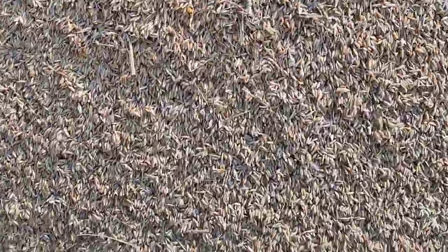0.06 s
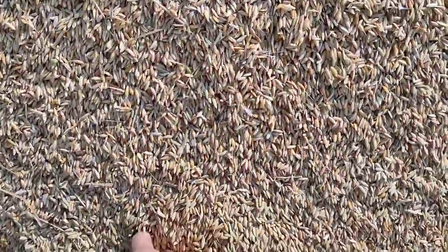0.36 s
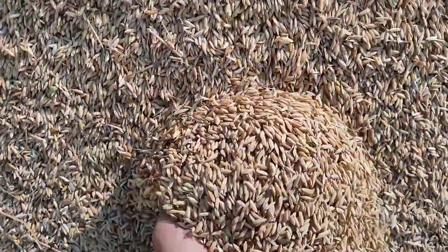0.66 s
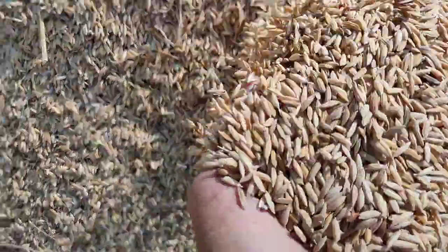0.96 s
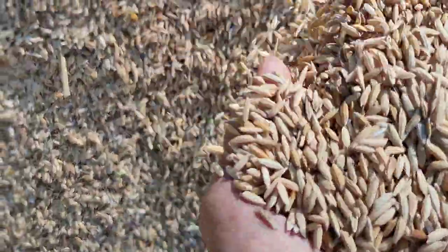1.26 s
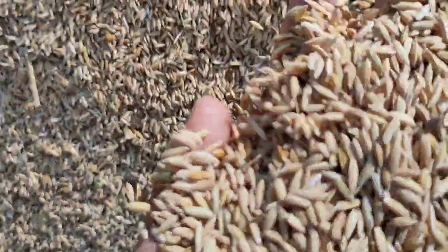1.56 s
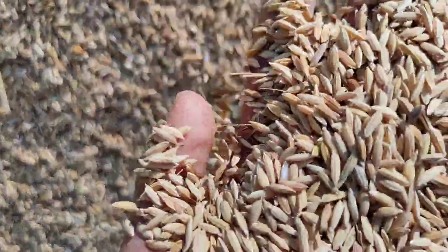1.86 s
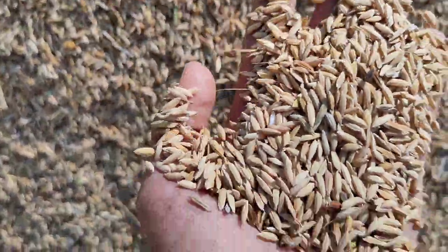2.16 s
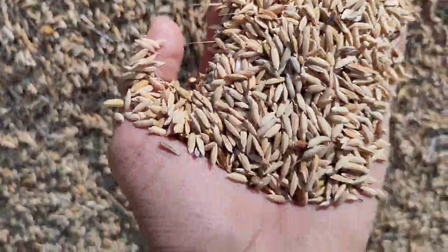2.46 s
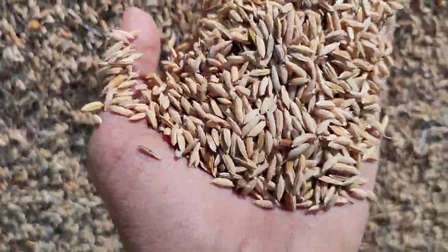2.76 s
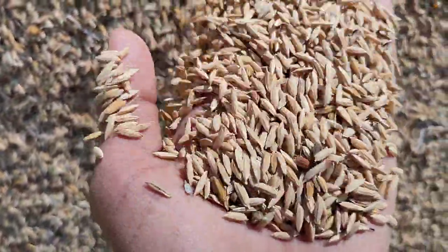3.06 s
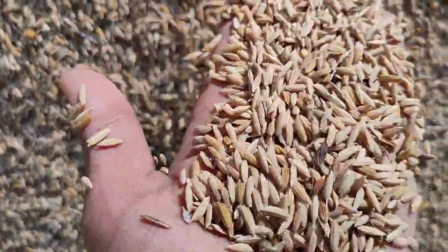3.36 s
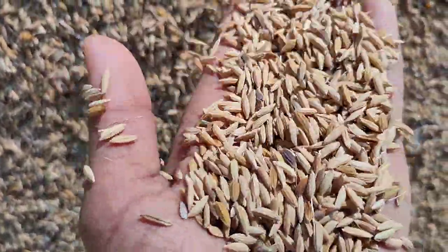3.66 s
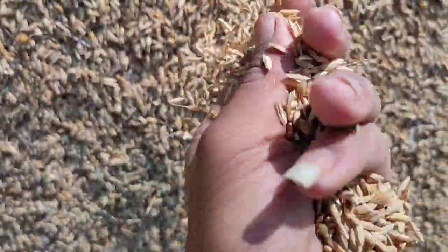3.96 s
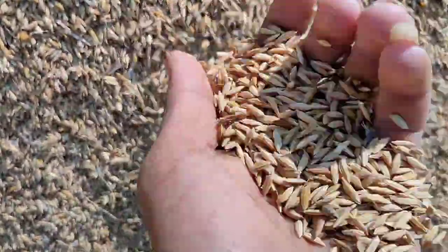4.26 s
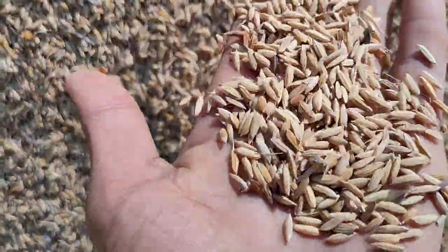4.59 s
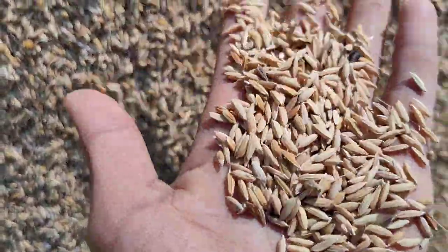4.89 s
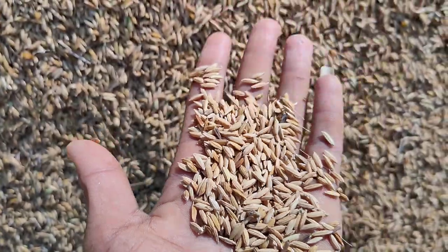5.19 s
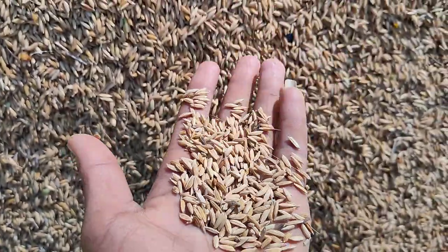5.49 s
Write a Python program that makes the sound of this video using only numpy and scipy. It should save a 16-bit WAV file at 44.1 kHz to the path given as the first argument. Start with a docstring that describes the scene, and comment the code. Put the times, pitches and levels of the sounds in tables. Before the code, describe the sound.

Grain slides and clicks off a close handful over the constant roar, fast rattle and faint hum of a tractor-driven thresher.

```python
"""An open farmyard, beside the grain heap: a tractor drives a threshing machine.
The engine hums under the fan's roar; the belt-driven drum beats the crop once a turn.
Under load both slow down and the thresher runs louder. Grain hisses through the machine,
straw rasps and rushes in bursts, and kernels slide and tick off a handful close by."""
import sys
import numpy as np
from scipy import signal
from scipy.fft import rfft, irfft
from scipy.io import wavfile

SR = 44100
rng = np.random.default_rng(int(sys.argv[2]) if len(sys.argv) > 2 else 0)


def transcribe(u):
    """Save the signal u as a 16-bit wav file named by the first command-line argument.

    u: samples, shape (n,) or (channels, n), limited to [-1, 1]; the rate is SR.
    q: integer samples, one column per channel.
    """
    v = np.clip(np.atleast_2d(u).T, -1, 1)
    q = np.round(v * 32767).astype(np.int16)
    wavfile.write(sys.argv[1], SR, q)


N = 248283
TIME_S = np.arange(N) / SR
BINS_HZ = np.fft.rfftfreq(N, 1 / SR)


def gain_of(db):
    """Decibels to amplitude factor."""
    return 10 ** (np.asarray(db) / 20)


def unit_rms(x):
    """Scales to rms 1."""
    return x / np.sqrt(np.mean(x ** 2) + 1e-20)


def curve(rows):
    """Linear interpolation of (time, value) rows."""
    return np.interp(TIME_S, *np.transpose(rows))


def spectrum(rows):
    """Interpolates each column over log frequency."""
    hz, *columns = np.transpose(rows)
    return np.array([np.interp(np.log(BINS_HZ + 1), np.log(hz + 1), c) for c in columns])


def swell(peak_s, half_width_s):
    """Gaussian rise and fall, peak 1."""
    return np.exp(-2 * ((TIME_S - peak_s) / half_width_s) ** 2)


def drift(cutoff_hz):
    """Slow random wander, rms 1."""
    return unit_rms(irfft(rfft(rng.standard_normal(N)) / (1 + (BINS_HZ / cutoff_hz) ** 4), N))


def band_noise(hz, width_hz, size=N):
    """Noise in one steep resonance, independent per side."""
    offset = (np.fft.rfftfreq(size, 1 / SR) - hz) / width_hz
    return unit_rms(irfft(rfft(rng.standard_normal((2, size))) / (1 + offset ** 2) ** 3, size))


def crackle(near_share, per_s, spread_db):
    """Separate near impacts in a wash of countless far ones."""
    strength = gain_of(spread_db * np.minimum(rng.exponential(1, (2, N)), 4))
    polarity = rng.choice([-1, 1], (2, N))
    hits = rng.random((2, N)) < per_s / SR
    near = unit_rms(strength * polarity * hits)
    far = rng.standard_normal((2, N))
    return np.sqrt(near_share) * near + np.sqrt(1 - near_share) * far


def beat(turns, depth, decay_turns):
    """Envelope: one decaying blow per turn, of uneven strength."""
    blow = np.exp(-(turns % 1) / decay_turns) * gain_of(7.1 * drift(30))
    return unit_rms(np.sqrt(1 + depth * blow))


# Left-right likeness: (frequency [Hz], coherence [0-1])
COHERENCE = [(100, 0.99), (320, 0.96), (600, 0.97), (850, 1), (1100, 0.56), (1500, 0.64), (2200, 0.58),
             (3200, 0.42), (4300, 0.26), (6000, 0.18), (12000, 0.05)]


def radiate(drive, colour, lag_ms):
    """Colours a stereo drive, partly coherent, left side late; the mid signal has rms 1."""
    common, separate = rfft(drive)
    coherence = np.clip(spectrum(COHERENCE)[0], 0, 1)
    left = common * np.exp(-2j * np.pi * BINS_HZ * lag_ms / 1000)
    right = coherence * common + np.sqrt(1 - coherence ** 2) * separate
    pair = irfft(np.array([left, right]) * gain_of(spectrum(colour)), N)
    return pair / np.std(pair.mean(0))


# Crankshaft: (time [s], speed [turns/s])
ENGINE_SPEED = [(0, 33.45), (.5, 33.72), (1.4, 34.36), (2.45, 33.28), (3, 33.61), (3.5, 33.77), (5, 34.66),
                (5.63, 34.84)]
# Hum partials: (order [x engine speed], base level [dB])
ENGINE_ORDERS = [(8, -48.5), (9, -40.5), (10, -40.3), (11, -54), (11.5, -50.5), (13, -47.5), (14, -44),
                 (15, -52), (16, -52), (23, -48), (24, -61), (26, -63)]
# Hum contour: (time [s], level offset [dB])
HUM_CONTOUR = [(0, -3), (2, -1), (3.2, -0.9), (3.8, 1), (5.1, -1.5)]
# Panel resonances: (frequency [Hz], width [Hz], lift [dB])
PANEL_MODES = [(307.6, 8.3, 4.5), (467.7, 4.2, 5.5)]


def engine(turns, waver_db=2.0, jitter_rad=0.28, flutter_rad=0.00051):
    """Engine orders waver a little and boom as they pass a panel resonance."""
    hum = np.zeros((2, N))
    lag_turns = np.array([[.0062], [0]])
    speed_hz = curve(ENGINE_SPEED)
    for order, db in ENGINE_ORDERS:
        # uneven rotation blurs the highest orders most
        unsteady_rad = jitter_rad * drift(7.7) + flutter_rad * order ** 2 * drift(22)
        phase_rad = 2 * np.pi * (order * (turns - lag_turns) + rng.random()) + unsteady_rad
        boom_db = sum(lift_db / (1 + (2 * (order * speed_hz - hz) / width_hz) ** 2)
                      for hz, width_hz, lift_db in PANEL_MODES)
        level_db = curve(HUM_CONTOUR) + db + boom_db + waver_db * drift(3.2)
        hum += np.sqrt(2) * gain_of(level_db) * np.sin(phase_rad)
    return gain_of([[-.8], [0]]) * hum


# Wads of crop, negative for thin feed: (time [s], swell [dB], half-width [s])
FEED_WADS = [(.09, 0.8, 0.18), (0.577, -1.2, 0.13), (0.836, 1.5, .1), (1.3, 0.5, 0.24), (1.742, 1.6, 0.32),
             (3.224, 4.3, 0.061), (3.427, 5, 0.019), (3.694, 0.5, 0.2)]


def working_db(base_db, db_per_sag_hz, wad_scale, usual_speed_hz=34):
    """A part runs louder as load drags the engine down and as a wad passes."""
    sag_hz = usual_speed_hz - curve(ENGINE_SPEED)
    wads_db = sum(db * swell(s, half_width_s) for s, db, half_width_s in FEED_WADS)
    return base_db + db_per_sag_hz * sag_hz + wad_scale * wads_db


# Fan spectrum: (frequency [Hz], left [relative dB], right [relative dB])
FAN_COLOUR = [(138, -61, -62), (209, -42, -38), (263, -15.5, -14.5), (271, -8.5, -11), (322, 0, 2),
              (353, -3.5, -2), (430, -2.5, -4), (547, -9.5, -7), (740, -13.5, -11), (800, -9.5, -9),
              (815, -14, -13.5), (1190, -24, -20.5), (2010, -79, -60)]


def fan(turns, rise_s=0.26, rise_db=5):
    """The winnowing fan's roar swells at first and throbs once per drum turn."""
    air = rng.standard_normal((2, N)) * beat(turns, depth=.4, decay_turns=0.062)
    onset_db = rise_db * np.minimum(TIME_S / rise_s - 1, 0)
    level_db = working_db(-33, db_per_sag_hz=0.63, wad_scale=0.74) + onset_db
    return radiate(air, FAN_COLOUR, lag_ms=0.12) * gain_of(level_db + .5 * drift(5.3))


# Casing and stalk spectra: (frequency [Hz], left [relative dB], right [relative dB])
CASING_COLOUR = [(500, -56, -47), (880, -2, -16.5), (1070, 0, -4.5), (1400, 1.5, -1.5), (1790, 0, -3.5),
                 (2140, -0.5, -13.5), (2980, -55, -17), (6000, -67, -54)]
STALK_COLOUR = [(1200, -40, -57), (1880, -2.5, -16), (2320, -11.5, -3), (2700, 0, -6), (3500, -1, -9),
                (4210, -3.5, -12), (5020, -10.5, -17), (6050, -21, -12.5), (9000, -45, -27)]


def drum(turns):
    """Beaters hit the crop each turn: the casing clatters, the stalks rattle."""
    clatter = crackle(0.09, per_s=900, spread_db=0) * beat(turns, depth=1.9, decay_turns=0.038)
    rattle = crackle(0.24, per_s=1800, spread_db=2.5) * beat(turns, depth=1, decay_turns=0.09)
    casing_db = working_db(-43, db_per_sag_hz=.8, wad_scale=1.04) + 0.16 * drift(32)
    stalks_db = working_db(-42.5, db_per_sag_hz=0.98, wad_scale=0.78) + 1.15 * drift(19)
    casing = radiate(clatter, CASING_COLOUR, lag_ms=0.29) * gain_of(casing_db)
    stalks = radiate(rattle, STALK_COLOUR, lag_ms=0.328) * gain_of(stalks_db + 0.12 * scrape_db())
    return casing + stalks


# Grain stream spectrum: (frequency [Hz], left [relative dB], right [relative dB])
GRAIN_COLOUR = [(2500, -49, -38), (4930, -15, -16), (6020, -14.5, -14), (6680, -7, 0), (7300, -7, 2),
                (8350, -7, -4), (9600, -9, -7), (10500, -6, -12), (12000, -10, -7.5), (13600, -12.5, -18),
                (14900, -20, -4.5), (15600, -21, -12)]


def grain(turns, scoop_s=0.57, scoop_pan_db=7.0):
    """A dense kernel stream pulses with the drum; its hiss swings left as the hand scoops."""
    impacts = crackle(0.14, per_s=3000, spread_db=4) * beat(turns, depth=.5, decay_turns=0.18)
    level_db = working_db(-42.1, db_per_sag_hz=1, wad_scale=0.22) + 0.74 * drift(27)
    stream = radiate(impacts, GRAIN_COLOUR, lag_ms=0.334) * gain_of(level_db)
    pan_db = -1.1 + scoop_pan_db * swell(scoop_s, half_width_s=0.49)
    return stream * gain_of(pan_db * [[.5], [-.5]])


# Straw on the sieve: (start [s], hold [s], swell [dB])
SIEVE_SCRAPES = [(-.2, .9, 1), (2.14, 0.21, 7.0)]


def scrape_db(rise_s=0.16, fall_s=.09):
    """Each long scrape rises, holds and falls."""
    return sum(db * np.interp(TIME_S, np.cumsum([s, rise_s, hold_s, fall_s]), [0, 1, 1, 0])
               for s, hold_s, db in SIEVE_SCRAPES)


# Straw spectrum: (frequency [Hz], left [relative dB], right [relative dB])
STRAW_COLOUR = [(1010, -48, -54), (1720, -8.5, -49), (2040, -2.5, -2), (2270, 3, -41), (2570, -0.5, -18),
                (2900, -9, -38), (3600, -11.5, -43), (6000, -50, -57)]
# Straw bursts: (time [s], base level [dB], half-width [s], centre [Hz])
STRAW_RUSHES = [(0.058, -31, .015, 2210), (.2, -31, .013, 2140), (0.369, -32, 0.016, 2060),
                (1.2, -33.5, 0.042, 2730), (3.207, -35, 0.047, 3300), (3.426, -35, 0.022, 3500),
                (3.645, -35.5, 0.018, 3300), (5.03, -41, .025, 2900), (5.185, -33, 0.014, 2700),
                (5.352, -34.5, 0.031, 2620)]


def straw(turns):
    """Straw on the left rasps with the drum, scrapes the sieve and rushes through in hollow bursts."""
    friction = crackle(0.073, per_s=1200, spread_db=-1) * beat(turns, depth=1.8, decay_turns=0.15)
    level_db = working_db(-44, db_per_sag_hz=2.5, wad_scale=0.5) + scrape_db() + 0.92 * drift(6.8)
    rasp = radiate(friction, STRAW_COLOUR, lag_ms=.25) * gain_of(level_db)
    bursts = sum(band_noise(hz, width_hz=600) * gain_of(db) * swell(s, half_width_s)
                 for s, db, half_width_s, hz in STRAW_RUSHES)
    return rasp + bursts * gain_of([[2], [-13]])


# Rumble spectrum: (frequency [Hz], left [relative dB], right [relative dB])
RUMBLE_COLOUR = [(20, 4, 2), (100, -16, -12), (200, -5, -3), (400, -20, -20)]


def rumble(level_db=-86):
    """Faint, steady low noise."""
    return gain_of(level_db) * radiate(rng.standard_normal((2, N)), RUMBLE_COLOUR, lag_ms=.12)


# Sliding kernel spectrum: (frequency [Hz], left [relative dB], right [relative dB])
SLIDE_COLOUR = [(2500, -50, -46), (5000, -32, -19), (5960, -10, -5), (6940, -21, 3), (7160, -9, 5),
                (8200, -11, -4), (9200, 2.5, -5), (10500, -15, -4), (12500, -18, -11), (14300, -20, -8),
                (15300, -18, -6)]
# Slides in the hand: (time [s], level [dB], half-width [s])
HAND_SLIDES = [(1.73, -40.5, 0.42), (2.14, -42, 0.23), (2.354, -51, 0.14), (3.138, -39.5, 0.25),
               (3.9, -60, 0.48)]


def handful(trickle_db=-50):
    """Kernels trickle off a near hand and slide as it tilts or closes; husks rub with a duller rustle."""
    slide_power = sum((gain_of(db) * swell(s, half_width_s)) ** 2 for s, db, half_width_s in HAND_SLIDES)
    clicks = radiate(crackle(0.42, per_s=2500, spread_db=7.5), SLIDE_COLOUR, lag_ms=0.292)
    husks = band_noise(3470, width_hz=1900) * gain_of([[1], [-5]])
    return (clicks + husks) * np.sqrt(gain_of(trickle_db) ** 2 + slide_power)


# Single kernels: (time [s], base level [dB], ring [Hz], t60 [s])
KERNEL_STRIKES = [(.783, -33, 12500, .05), (2.086, -29, 7400, .05), (2.335, -34, 12500, .03),
                  (2.505, -29, 12300, .03), (2.776, -29.5, 7700, .04), (3.189, -25, 8250, .07),
                  (3.222, -32, 7500, 0.037), (3.417, -25.5, 8200, 0.043), (3.548, -32, 12800, 0.043),
                  (3.958, -29, 8600, 0.036), (4.32, -34, 12300, .03), (4.443, -31, 12200, .025),
                  (4.51, -30, 8500, 0.043), (4.821, -29, 7340, .035), (4.98, -32, 7200, .015),
                  (5.291, -22, 7700, 0.014)]


def kernels(snap=0.45, snap_s=0.0014, bounce=0.42, bounce_s=0.0042, rise_s=0.00049):
    """Each kernel strikes with a snap and a short bright ring, then bounces once."""
    ticks = np.zeros((2, N + SR))
    t = np.arange(4096) / SR
    attack = 1 - np.exp(-t / rise_s)
    for s, db, hz, t60_s in KERNEL_STRIKES:
        ring = gain_of(-60 * t / t60_s)
        rebound = bounce * (t > bounce_s) * gain_of(-60 * abs(t - bounce_s) / t60_s)
        envelope = attack * (ring + rebound + snap * np.exp(-t / snap_s))
        noise = band_noise(hz, width_hz=3600, size=len(t))
        start = round(s * SR)
        ticks[:, start:start + len(t)] += gain_of(db) * noise * envelope
    return ticks[:, :N] * gain_of([[-9], [-3]])


def scene(belt_ratio=1.047):
    """The belt locks the drum to the engine; near kernels and a low rumble join them."""
    engine_turns = np.cumsum(curve(ENGINE_SPEED)) / SR
    drum_turns = belt_ratio * engine_turns
    background = rumble()
    thresher = fan(drum_turns) + drum(drum_turns) + grain(drum_turns) + straw(drum_turns)
    return engine(engine_turns) + thresher + background + handful() + kernels()


def record(dry, cutoff_hz=15900):
    """Steep low-pass band limit."""
    taps = signal.firwin(801, cutoff_hz, window=("kaiser", 9), fs=SR)
    return signal.oaconvolve(dry, taps[None], "same")


dry = scene()
out = record(dry)
transcribe(out)
```